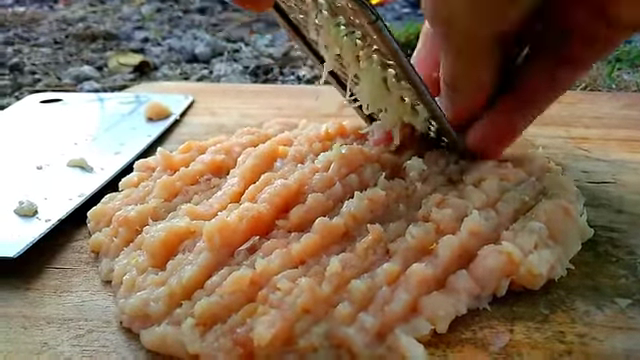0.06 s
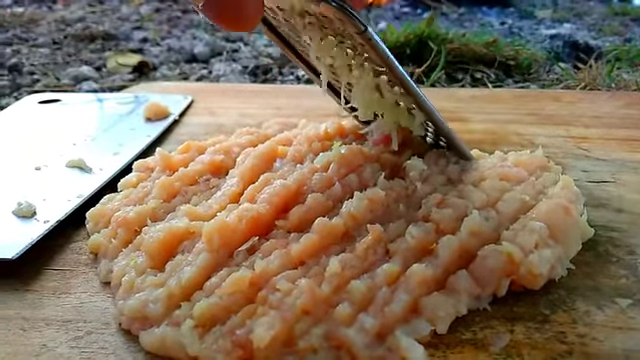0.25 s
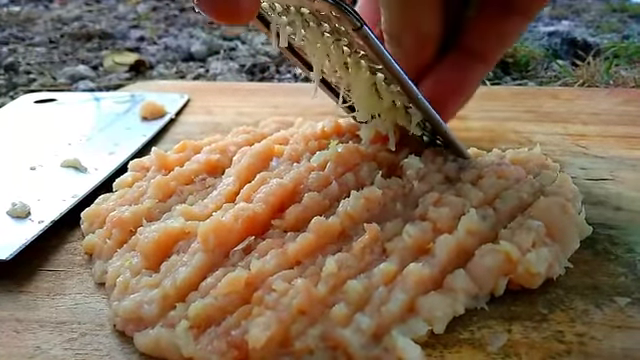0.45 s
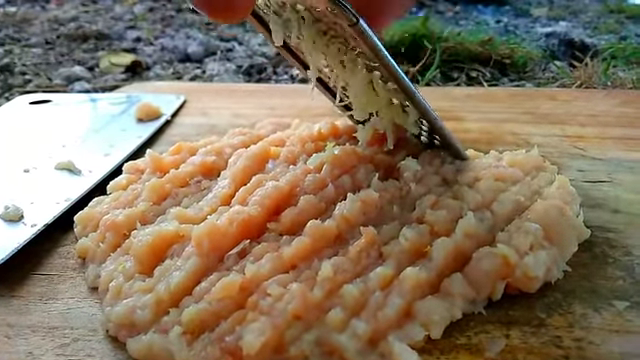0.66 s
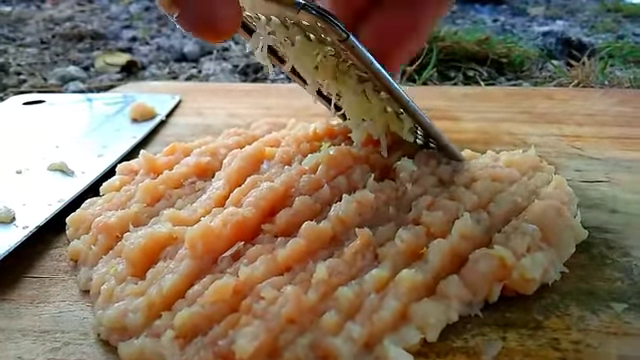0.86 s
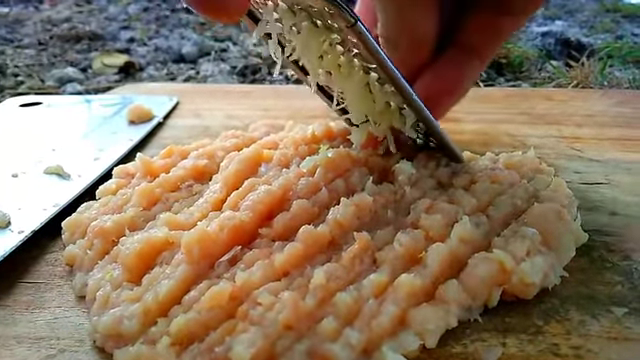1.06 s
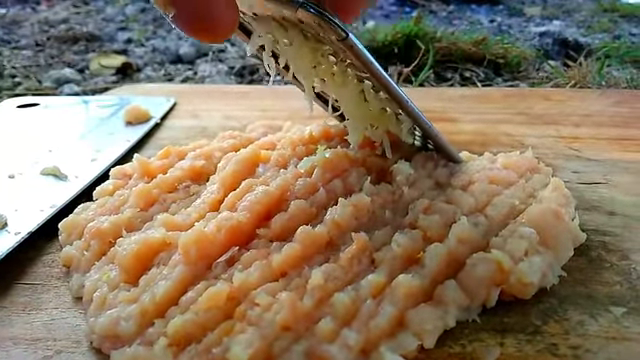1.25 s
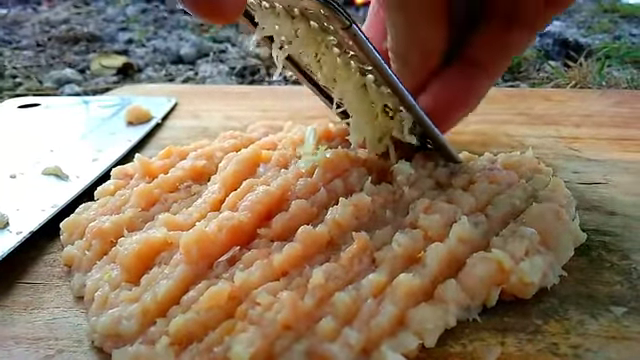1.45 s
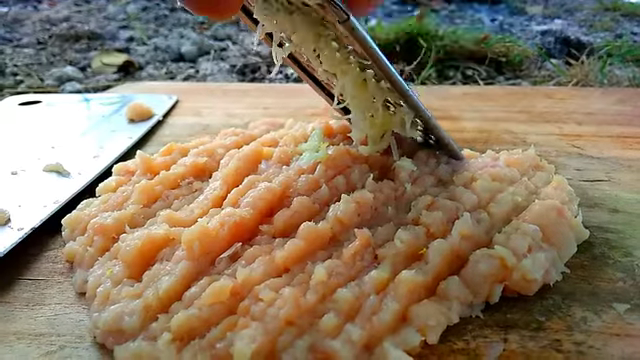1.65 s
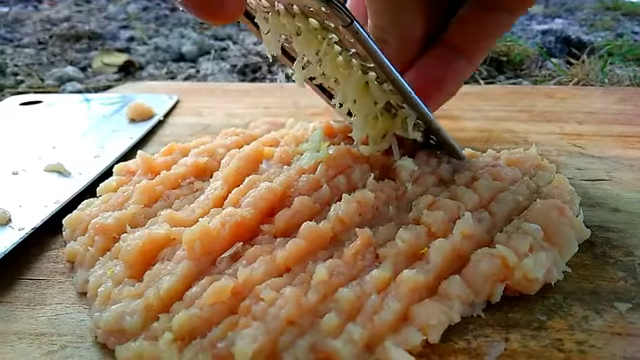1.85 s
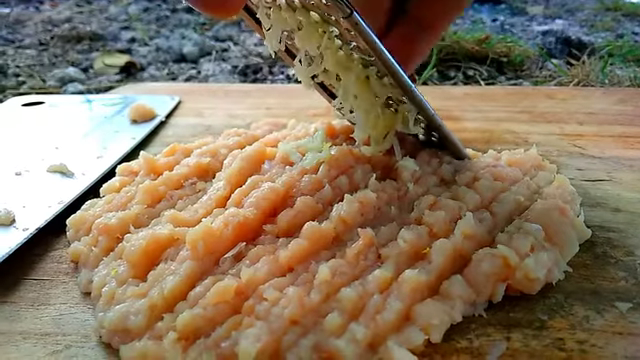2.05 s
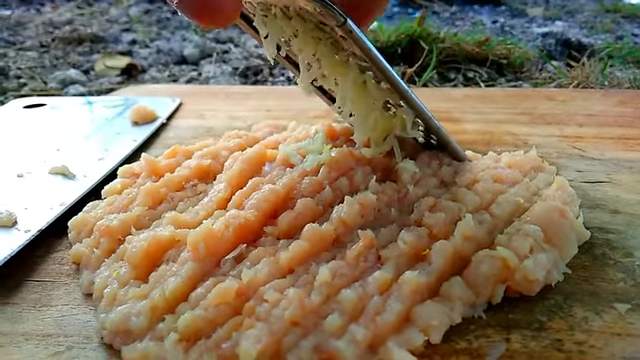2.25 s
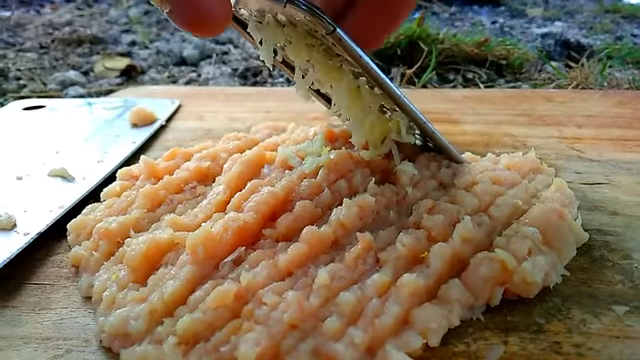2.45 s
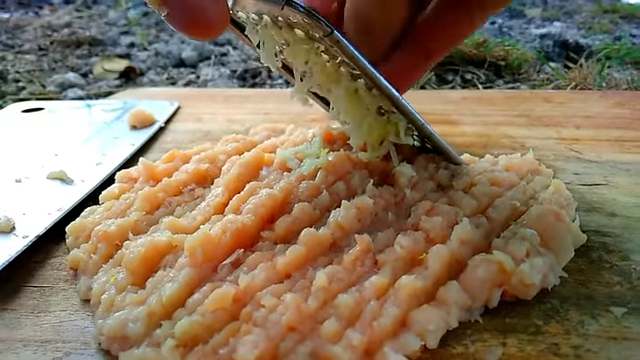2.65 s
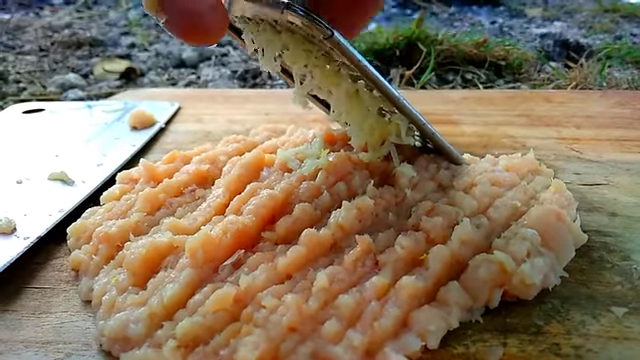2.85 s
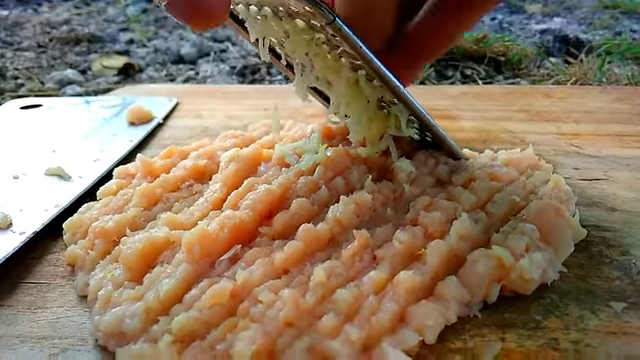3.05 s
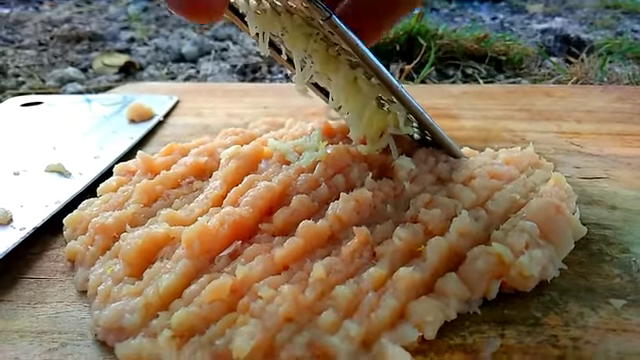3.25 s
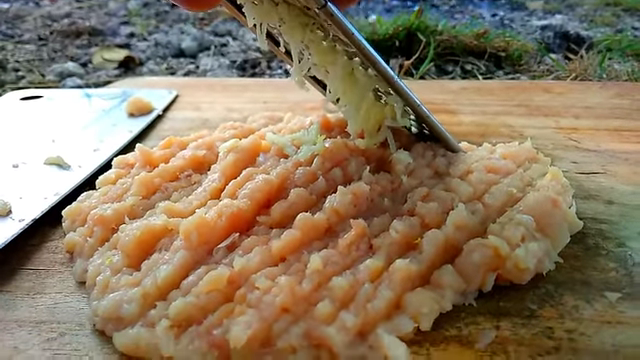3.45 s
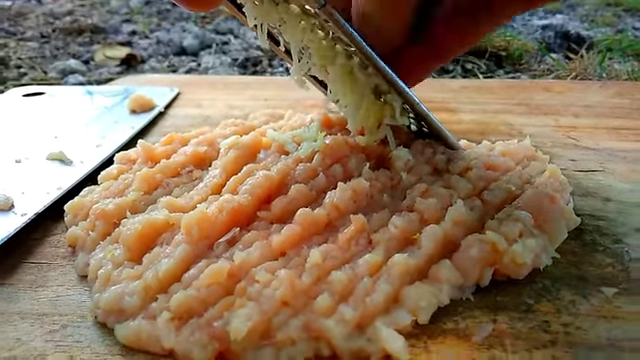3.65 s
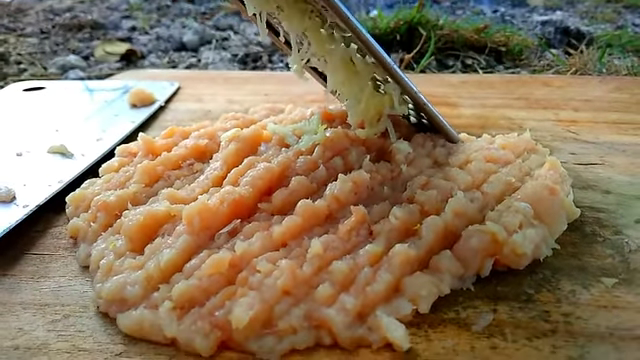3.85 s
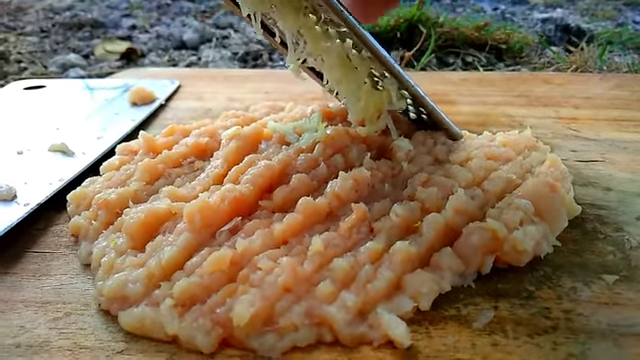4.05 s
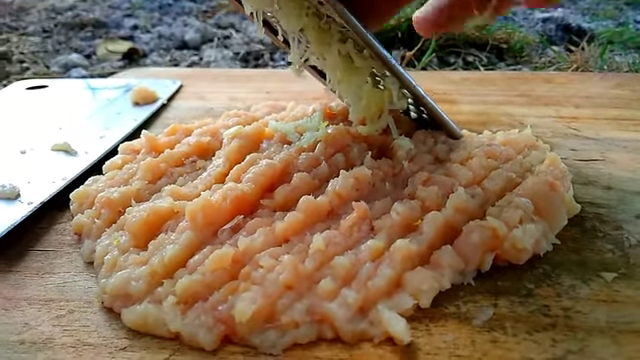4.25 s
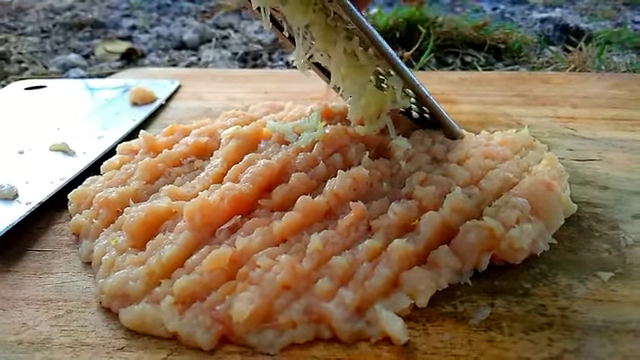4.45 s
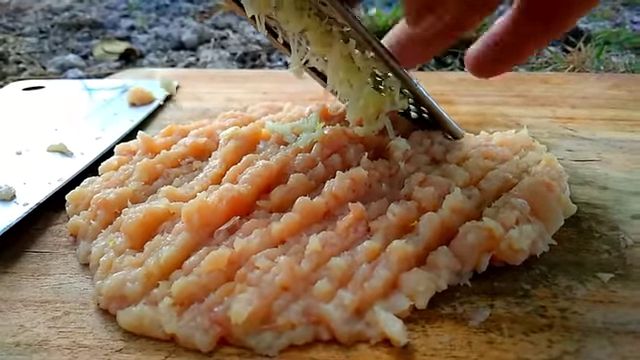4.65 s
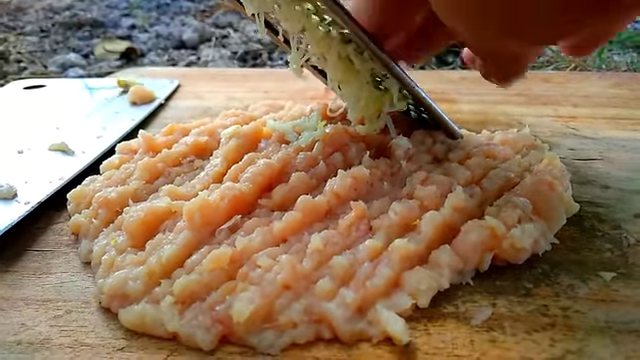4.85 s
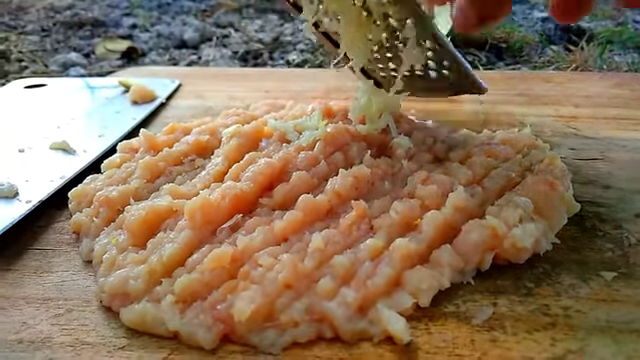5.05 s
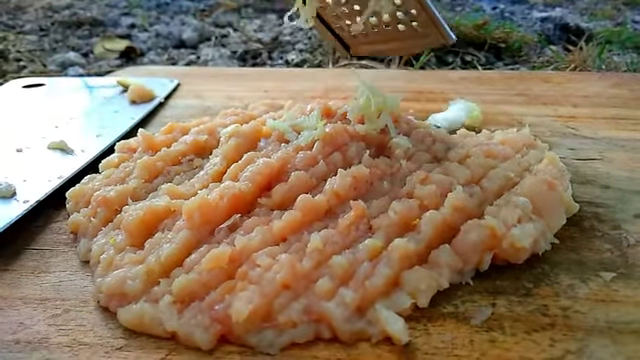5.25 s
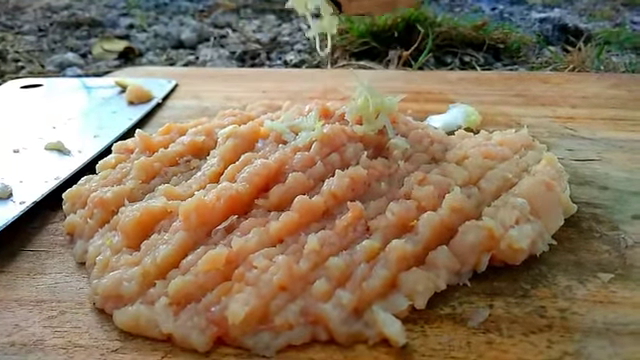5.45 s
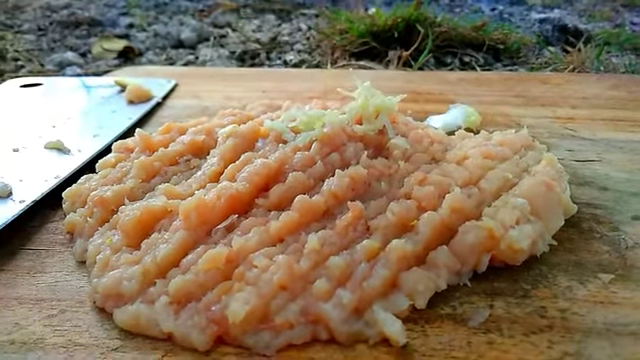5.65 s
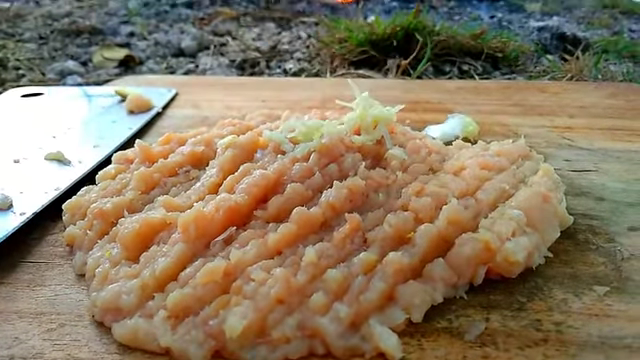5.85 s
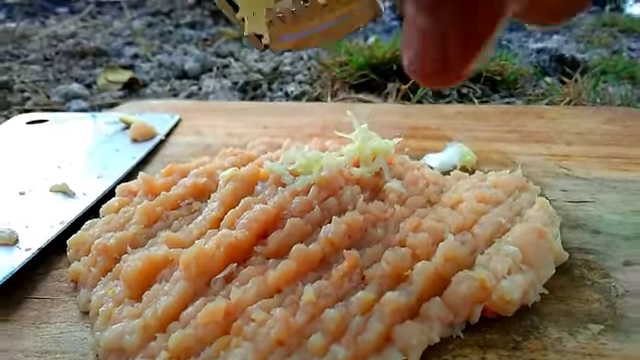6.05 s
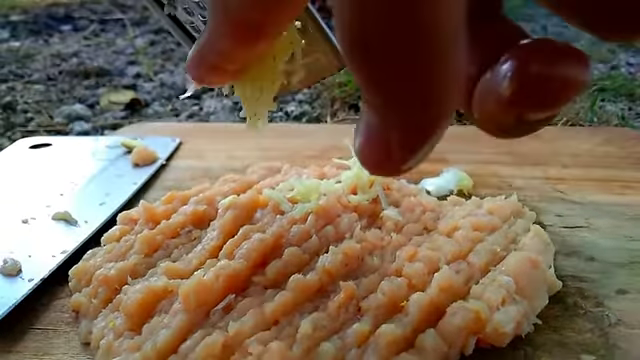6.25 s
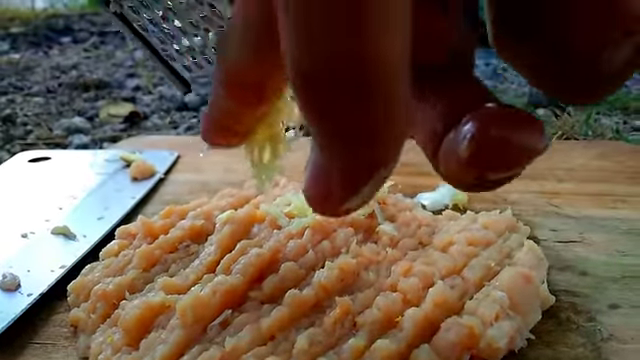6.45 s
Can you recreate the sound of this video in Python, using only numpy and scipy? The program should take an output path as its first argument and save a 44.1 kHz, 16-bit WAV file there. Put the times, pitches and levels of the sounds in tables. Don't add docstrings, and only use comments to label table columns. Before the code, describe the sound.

A root rasps over a metal grater in five quick bright strokes, then slower juddering rubs with snags, before fading into windy outdoor quiet.

```python
import sys
import numpy as np
from scipy import signal
from scipy.fft import rfft, irfft, next_fast_len
from scipy.io import wavfile
from scipy.ndimage import uniform_filter1d, map_coordinates

SR = 44100
rng = np.random.default_rng(int(sys.argv[2]) if len(sys.argv) > 2 else 0)


def volts_from_decibels(level):
    exponent = np.asarray(level, float) / 20
    return 10 ** exponent


def master(y):
    cut = np.clip(np.atleast_2d(y).T, -1, 1)
    pcm = np.round(cut * 32767)
    wavfile.write(sys.argv[1], SR, pcm.astype(np.int16))


N = 287519

# contact_s, length_s, rasp_db, firmest_at (0-1 of the way), shake_re_rasp_db
PUSHES = [
    (-0.05, 0.16, -24, 0.57, -0.5),
    (0.415, 0.18, -27.5, 0.48, 3),
    (0.856, 0.21, -27.5, 0.54, 2),
    (1.342, 0.2, -27, 0.45, 2.5),
    (1.811, 0.175, -29, 0.46, 2.5),
]
# contact_s, length_s, rasp_db, firmest_at (0-1), shake_re_rasp_db
SLOW_PUSHES = [
    (2.535, 0.16, -41, 0.63, 4),
    (2.935, 0.13, -38, 0.42, 3.5),
    (3.578, 0.14, -43, 0.5, 2),
    (4.166, 0.013, -54, 0.5, 7),
    (4.205, 0.046, -44.5, 0.35, 3.5),
    (4.862, 0.14, -47, 0.45, 9),
    (3.492, 0.0057, -68, 0.5, -16),
    (4.06, 0.067, -60, 0.84, -6.5),
    (4.595, 0.012, -64, 0.7, -32),
    (4.705, 0.053, -55, 0.34, 1),
]
# contact_s, length_s, rasp_db, firmest_at (0-1), shake_re_rasp_db
RETURNS = [(0.2, 0.165, -39.5, 0.64, -9.5), (0.262, 0.032, -46.5, 0.5, 5), (0.65, 0.14, -43, 0.68, -10),
           (0.69, 0.032, -52.5, 0.3, 3), (1.15, 0.14, -43.5, 0.58, -4.5), (1.648, 0.12, -43, 0.12, -4.5),
           (2.05, 0.06, -52.5, 0.7, -37), (2.11, 0.16, -62.5, 0.29, 6), (2.795, 0.1, -48.5, 0.46, -6.5),
           (3.14, 0.098, -68, 0.5, 4), (3.22, 0.068, -72, 0.18, 14), (3.765, 0.066, -58, 0.6, -7),
           (3.85, 0.088, -60.5, 0.6, 6.5), (4.79, 0.046, -62, 0.06, -2), (5.03, 0.064, -64, 0, -7.5),
           (3.15, 0.044, -55.5, 1, -22)]
# contact_s, length_s, rasp_db, firmest_at
# (0-1), shake_re_rasp_db
BRUSHES = [(3.37, 0.12, -89, 0.45, 11), (4.33, 0.071, -78.5, 0, -5), (6.7, 0.17, -82.5, 0, -10),
           (5.2, 0.12, -82.5, 0.4, 3.5), (6.8, 0.3, -76.5, 0.4, 1.5), (4.7, 0.27, -80.5, 0.9, -4.5),
           (4.0, 0.057, -70, 0.4, 3.5), (2.31, 0.3, -79, 0.5, -2), (0.56, 0.02, -62.5, 0.5, -3),
           (0.82, 0.022, -62.5, 0.5, -3.5), (1.31, 0.02, -62, 0.5, -3), (2, 0.02, -60.5, 0.5, -4.5),
           (0.22, 0.034, -61, 0.5, -3.5)]
# landing, swell, fade, lift (all dB/s), scrape_slope and plate_slope (times
# the rasp's), scrape_re_rasp_db, plate_follows (how far the plate follows the grip)
PUSH_STROKE = (2196, 82, 85.5, 797, 1.0, 1.47, -10, 1.6)
SLOW_STROKE = (1100, 76, 41, 391, 1.1, 1.42, -9.5, 2)
RETURN_STROKE = (331, 51.5, 78, 1293, 1.36, 1.97, -9, 1.54)
BRUSH_STROKE = (148, 17, 12, 148, 2.5, 0, -4, -2)
# start_s, peak_db
SNAGS = [(0.073, -18.5), (0.413, -23), (0.47, -24.5), (0.873, -23), (1.351, -27), (1.829, -25.5),
         (1.911, -11), (1.965, -23.5), (2.136, -44), (2.245, -34), (2.539, -30.5), (2.559, -15.5),
         (2.597, -26.5), (2.634, -21.5), (2.937, -43), (2.996, -38), (3.028, -14.5), (3.584, -28),
         (3.618, -23.5), (3.651, -18.5), (3.69, -13.5), (3.715, -23), (3.892, -35), (4.17, -32),
         (4.207, -23), (0.036, -23.5), (0.991, -12), (4.867, -25.5), (4.894, -24), (4.92, -26),
         (0.003, -16), (0.016, -19), (0.043, -11), (0.058, -21.5), (0.09, -24.5), (0.425, -27),
         (0.449, -28), (0.496, -17), (0.517, -20), (0.89, -21), (0.902, -22), (0.934, -16), (0.982, -15),
         (1.005, -19), (1.04, -18.5), (1.377, -28.5), (1.407, -17), (1.431, -20), (1.449, -12.5),
         (1.466, -17), (1.875, -15), (2.951, -17.5), (4.232, -35), (4.242, -28.5), (4.259, -32.5),
         (4.94, -26), (5.008, -36), (5.032, -43)]
# rasp_db, scrape_db, plate_db
STICK_DB = (-1.5, -4, -13)
# freq_hz, level_db
TEETH = [(3530, -33.5), (6000, -12), (7740, -11), (8160, -9.5), (10500, -2), (14300, -10.5), (14900, -6),
         (15800, -28.5)]
# freq_hz, level_db
SCRAPE = [(740, -14.5), (1250, -8), (1580, -8.5), (1700, -3.5), (2110, -3.5), (2290, -1.5), (3770, -8.5),
          (4240, -4.5), (4770, -4.5), (6500, -11), (8450, -41.5), (14300, -120)]
# freq_hz, width_hz, level_db
PLATE = [
    (529, 40, -3.5),
    (600, 60, 1.5),
    (663.5, 47.6, 6),
    (750.6, 95, 4),
    (838.4, 80, 3.5),
    (960.5, 88, 6),
    (1081, 100, 1.5),
]
# freq_hz, left_minus_right_db
LEAN = [(200, 4), (400, 6.5), (1300, 4), (4400, 2), (8000, 0), (15000, -1)]
# freq_hz, level_db
FAR_COLOUR = [(12, -32.5), (20, -8.5), (38, -7.5), (70, 0.5), (98, -7), (175, -6), (315, -24), (667, -31.5),
              (881, -42), (7730, -52), (10500, -42.5), (15500, -64)]
# freq_hz, likeness (0-1)
FAR_ALIKE = [(40, 0.1), (130, 1), (400, 0.21), (1400, 0.13)]
# time_s, level_db
DRONE = [
    (0, -52.5),
    (2, -55),
    (4.4, -50.5),
    (5.299, -53.5),
    (6.5, -59.5),
]
# freq_hz, width_hz, level_db
THUD = [
    (647, 61, 5),
    (960, 19, -13),
    (2300, 1200, -42),
]
# start_s, peak_db, pitch_hz, t60_s
TAPS = [(2.09, -47, 676, 0.054), (2.186, -47.5, 790, 0.048), (3.42, -51.5, 690, 0.046),
        (3.985, -49, 940, 0.04), (4.046, -46, 3000, 0.005), (4.068, -58, 1050, 0.035),
        (4.642, -45, 960, 0.027), (4.747, -47, 860, 0.016), (4.816, -47, 786, 0.11),
        (5.256, -57, 955, 0.03), (5.818, -59.5, 5880, 0.015), (5.953, -62.5, 5500, 0.0086),
        (5.99, -85, 2196, 0.16), (6.025, -77.5, 2160, 0.1), (4.715, -45.5, 650, 0.048),
        (4.724, -44, 1055, 0.048), (4.758, -48, 1110, 0.052), (4.762, -56, 623, 0.03),
        (4.832, -48, 790, 0.045), (4.128, -63, 1040, 0.03), (0.273, -42, 920, 0.065),
        (0.29, -48, 985, 0.045), (0.688, -39.5, 983, 0.09), (1.635, -44, 970, 0.064),
        (5.72, -75.5, 1490, 0.031), (5.915, -73, 1350, 0.04), (6.26, -77, 2000, 0.06),
        (5.835, -70, 5000, 0.011), (4.588, -52, 11500, 0.06), (4.598, -48.5, 11400, 0.06),
        (4.607, -46, 11150, 0.05), (0.006, -22, 580, 0.091), (0.034, -21, 590, 0.12),
        (0.066, -23, 600, 0.14), (2.787, -44.5, 700, 0.072), (3.845, -46, 649, 0.05),
        (3.867, -46, 701, 0.05), (3.908, -43, 719, 0.045), (3.922, -43, 681.4, 0.05)]
# start_s, peak_db, mid_re_peak_db
RIPS = [(0.0063, -25, -27), (0.51, -18, -25), (0.495, -22, -25), (1.42, -13, -25), (1.941, -23, -16),
        (2.9452, -32.5, -25.5), (4.13, -42.5, -25), (4.2138, -17.5, -30), (4.232, -36, -25),
        (2.998, -18, -25), (4.9182, -24.5, -23), (4.8953, -33, -25), (3.651, -30, -10), (3.716, -34, -7),
        (2.635, -29, -7), (6.499, -52, -12), (1.911, -22, -15), (1.966, -26, -15), (3.8, -44, -30),
        (3.2, -39, -30)]
# start_s, peak_db, mid_re_peak_db
SNAPS = [(0.193, -38.5, -25), (0.3934, -33, -27), (0.5504, -22, 16.5), (0.7005, -25, -9),
         (1.3097, -34, -40), (1.6476, -21, -36), (2.0303, -17, -40), (2.3747, -52.5, -15.5),
         (2.524, -34, 6.5), (2.545, -20.5, -44), (2.56, -18, 6), (2.8235, -36, -30), (3.2195, -36, -32),
         (3.4971, -42, -26.5), (3.6898, -44.5, -18), (3.7975, -40, -39), (3.9853, -41, -2),
         (4.0452, -36.5, 9), (4.126, -31, -33), (4.1619, -19, -42), (4.2073, -15, -24), (4.3878, -56, -18),
         (4.6013, -51, -44.5), (4.9193, -26, -21), (5.2508, -56, -11), (5.3815, -54.5, -13),
         (5.8178, -62, -2), (5.9534, -53, -20.5), (6.502, -53, -13.5)]
# start_s, peak_db, mid_re_peak_db
TICKS = [(0.849, -20, -25), (0.853, -15.5, -30), (0.881, -15, -27), (1.3274, -42, -25),
         (1.3334, -19.5, -25), (1.565, -36, -25), (1.5927, -42, -23), (1.805, -28, -25), (1.8166, -33, -23),
         (2.595, -36, -25), (2.6057, -40, -25), (2.789, -40, -25), (2.9266, -30, -25), (3.049, -31, -25),
         (3.1501, -38, -25), (3.1905, -30, -25), (3.5745, -27, -28), (3.6121, -36, -25), (3.6196, -24, -25),
         (3.7722, -41, -25), (3.9667, -42, -25), (4.091, -47, -25), (4.1887, -22, -27), (4.7091, -39, -25),
         (4.787, -40, -25), (4.8947, -30, -25), (4.9074, -26, -25), (4.9555, -37, -25), (5.045, -35, -26),
         (6.0544, -67, -24.5)]
# start_s, peak_db, pitch_hz, port (0 left, 1 right)
PUFFS = [(0.42, -40, 91, 1), (0.615, -32.5, 51.6, 1), (1.162, -33, 42.3, 1), (1.376, -23.5, 90, 0),
         (1.5, -22.5, 121, 1), (1.531, -25, 91, 1), (1.958, -35.5, 51.7, 1), (2.662, -35.5, 47.7, 1),
         (2.904, -23, 42.5, 1), (2.952, -17.5, 53, 1), (3.026, -20, 48, 1), (3.1, -7.5, 63.2, 1),
         (3.188, -26.5, 61.5, 0), (3.236, -24.5, 63, 1), (3.324, -15, 63, 1), (3.38, -18, 57, 1),
         (3.412, -22, 67, 0), (3.451, -16, 60, 1), (3.53, -19, 53.8, 0), (3.594, -18.5, 62.6, 0),
         (3.687, -28.5, 49, 1), (3.858, -23, 48.3, 1), (4.049, -28.5, 55, 1), (4.171, -30, 50, 1),
         (4.388, -36, 67, 1), (4.817, -39, 42.05, 1), (5.649, -22, 76.1, 0), (5.681, -23, 62.16, 0),
         (5.882, -27, 77.1, 0), (6.232, -36.5, 75.1, 1)]
# start_s, length_s, peak_db, port (0 left, 1 right)
GUSTS = [(1.56, 0.34, -46, 1), (1.83, 0.042, -38.5, 0), (2.578, 0.11, -33, 1), (3.122, 0.077, -32, 1),
         (3.129, 0.14, -32, 0), (3.502, 0.16, -27.5, 1), (3.448, 0.05, -24.5, 0), (3.614, 0.23, -37, 0),
         (3.899, 0.32, -33, 1), (4.998, 0.35, -45.5, 0), (5.193, 0.0525, -36.5, 1), (5.579, 0.05, -28.5, 0),
         (5.598, 0.03, -33.5, 1), (5.704, 0.021, -32, 0), (5.918, 0.15, -37, 0), (5.95, 0.047, -36.5, 1)]
# freq_hz, threshold_db
FAINT_LINE_DB = [(700, -70), (1300, -18), (2000, -7.5), (3500, -4), (7500, -5), (9500, -10), (15500, -6)]
# freq_hz, luck (sigmas)
BAND_LUCK = [(1000, 4), (2500, 1.2), (3500, .3), (4600, .05), (5800, .4), (8000, .95), (9500, 1.6),
             (12000, 1.4), (15500, .8)]


def unit(x):
    return x / np.sqrt(np.mean(x ** 2) + 1e-20)


def along(points, hz):
    f, v = np.transpose(points)
    return np.interp(np.log(hz + 1), np.log(f + 1), v)


def filtered(x, response):
    m = next_fast_len(N + SR // 2)
    hz = np.fft.rfftfreq(m, 1 / SR)
    return irfft(rfft(x, m) * response(hz), m)[..., :N]


def wobble(rate):
    return map_coordinates(rng.standard_normal(1000), [np.arange(N) * rate / SR])


def grit(per_s, spread_db, smooth):
    tear = rng.random((2, N)) < per_s / SR
    size_db = spread_db * np.minimum(rng.exponential(size=(2, N)), 2)
    size = volts_from_decibels(size_db) * rng.standard_normal((2, N))
    return unit(tear * size) + smooth * rng.standard_normal((2, N))


def ports(pair, alike, colour):
    m = next_fast_len(N + SR // 4)
    hz = np.fft.rfftfreq(m, 1 / SR)
    sides = np.array([[1], [-1]])
    turn = np.arccos(np.clip(along(alike, hz), -1, 1)) / 2
    shared, opposed = rfft(pair, m) * colour(hz)
    lead = np.exp(1j * np.pi * sides * hz * 4 / SR)
    path = volts_from_decibels(sides * along(LEAN, hz) / 2) * lead
    mix = np.cos(turn) * shared + sides * np.sin(turn) * opposed
    return irfft(path * mix, m)[:, :N]


def hand(rows, stroke):
    landing, swell, fade, lift, scrape_slope, plate_slope, scrape_db, follows = stroke
    scrape_per_shake = 0.45
    t, levels = np.arange(N) / SR, np.zeros((3, N))
    for s, length, db, firmest, shake_db in rows:
        span = slice(max(round((s - .25) * SR), 0), round((s + length + .25) * SR))
        since = t[span] - s
        plate_firmest = .5 + follows * (firmest - .5)
        past = since - length * np.array([[firmest], [firmest], [plate_firmest]])
        grip_db = np.where(past < 0, swell * past, -fade * past)
        away_db = landing * np.minimum(since, 0) - lift * np.maximum(since - length, 0)
        offset_db = [[0], [scrape_db + scrape_per_shake * shake_db], [shake_db]]
        slopes = [[1], [scrape_slope], [plate_slope]]
        levels[:, span] += volts_from_decibels(db + (grip_db + away_db) * slopes + offset_db)
    return levels


def catches():
    slip_db, slip_t60_s = -11, 0.055
    stuck, slip = np.zeros((2, N))
    when, size_db = np.transpose(SNAGS)
    at = np.round(when * SR).astype(int)
    stuck[at] = 1
    slip[at] = volts_from_decibels(size_db + slip_db)
    stuck = np.convolve(stuck, np.hanning(800))[580:N + 580]
    dying = volts_from_decibels(-60 * np.arange(SR // 8) / SR / slip_t60_s)
    return stuck, np.abs(signal.fftconvolve(slip, dying)[:N])


def rasp():
    strokes = hand(PUSHES, PUSH_STROKE) + hand(SLOW_PUSHES, SLOW_STROKE)
    strokes += hand(RETURNS, RETURN_STROKE) + hand(BRUSHES, BRUSH_STROKE)
    rasp_level, scrape_level, shake_level = strokes
    stuck, slip = catches()
    rasp_held_db, scrape_held_db, plate_held_db = np.multiply.outer(STICK_DB, stuck)
    grip = wobble(45)
    bright = ports(grit(6400, 1.4, 0.8), [(9000, 0.14)], lambda hz: volts_from_decibels(along(TEETH, hz)))
    dull = ports(grit(1500, 1.8, 0.9), [(1400, 0.6), (4000, 0.35)], lambda hz: volts_from_decibels(along(SCRAPE, hz)))
    bright_gain = rasp_level * volts_from_decibels(rasp_held_db + 0.6 * grip + 1.0 * wobble(160) + 2.5)
    dull_gain = scrape_level * volts_from_decibels(scrape_held_db + 1.4 * grip + 0.98 * wobble(100) + 1.5)
    dull_gain = dull_gain + volts_from_decibels(-25) * slip
    friction = bright_gain * unit(bright) + dull_gain * unit(dull)
    shake = shake_level * volts_from_decibels(plate_held_db + 0.94 * grip + 0.52 * wobble(22) + 7) + slip
    share_db = 20 * np.log10((shake_level + 1e-7) / (rasp_level + 1e-7))
    firm = (0.5 + np.tanh((share_db + 3.0) / 4)) / 2
    return friction, shake, firm


def patchy(x, depth_db):
    z = signal.stft(x, nperseg=256)[2]
    field = uniform_filter1d(rng.standard_normal(z.shape[1:]), size=5, axis=0)
    field = uniform_filter1d(field, size=7, axis=1)
    gain = volts_from_decibels(depth_db * unit(field) - depth_db ** 2 / 9)
    return signal.istft(z * gain, nperseg=256)[1][:, :N]


def plate(hz, damping):
    modes = 0
    for k, (c, w, db) in enumerate(PLATE):
        modes = modes + (-1) ** k * volts_from_decibels(db) * 1j * hz * w / (c * c - hz * hz + 1j * hz * w * damping)
    board = (1j * hz) ** 2 / (480 ** 2 - hz * hz + 1j * hz * 200)
    return modes * board ** 2


def shaken(level, firm):
    push, skim = grit(500, 1.2, 0.67) * level * [firm, 1 - firm]
    tilt = lambda hz: volts_from_decibels(-5.5) * (hz / 800) ** 2.0 / (1 + (hz / 1300) ** 4)
    drive = push + filtered(skim, tilt)
    ring = lambda hz: plate(hz, damping=1.1)
    return ports(np.array([drive, np.roll(drive, 300)]), [(600, 0.97), (1100, 1.0)], ring)


def far():
    air = ports(rng.standard_normal((2, N)), FAR_ALIKE, lambda hz: volts_from_decibels(along(FAR_COLOUR, hz)))
    air = volts_from_decibels(-54.5 + 1.1 * wobble(3.7) + 1.3 * wobble(12)) * unit(air)
    level_db = np.interp(np.arange(N) / SR, *np.transpose(DRONE))
    turns = np.cumsum(87 + 1.8 * wobble(6.5)) / SR
    side_db = [[2.2], [-2.2]]
    return air + volts_from_decibels(level_db + 0.6 * wobble(19.0) + side_db) * np.sin(2 * np.pi * turns)


def knocks():
    blows = np.zeros(N)
    for s, db in SNAGS:
        blows[round(s * SR)] = volts_from_decibels(db + 29)

    def held(hz):
        thud = sum(volts_from_decibels(db) * 1j * hz * w / (c * c - hz * hz + 1j * hz * w) for c, w, db in THUD)
        board = (1j * hz) ** 2 / (430 ** 2 - hz * hz + 1j * hz * 500)
        soft = 1 / (1 + 1j * hz / 900) ** 2
        return thud * board * soft * 1.5

    return ports(np.array([blows, np.roll(blows, 40)]), [(600, 1.0), (2500, 1.0)], held)


def taps():
    t, out = np.arange(2000) / SR, np.zeros(N + 2000)
    for (s, db, hz, t60), chance in zip(TAPS, rng.standard_normal((len(TAPS), 12))):
        ring = 0
        for off in chance:
            ring = ring + np.sin(2 * np.pi * hz * (1 + 0.161 * np.tanh(off)) * t + 9 * off)
        out[round(s * SR):][:2000] += volts_from_decibels(db - 60 * t / t60) * np.tanh(t * hz / 1.5) * ring / 2.4
    low_cut = lambda hz: 1 / (1 + (480 / (hz + 1)) ** 16)
    return ports(np.array([out[:N], np.roll(out[:N], 40)]), [(600, 0.9), (5000, 0.55)], low_cut)


def snaps(rows, t60, rise_s):
    t = np.arange(1200) / SR
    envelope = volts_from_decibels(-60 * t / t60) * np.tanh((t + 1e-5) / rise_s)
    high, mid = np.zeros((2, 2, N + 1200))
    for s, db, mid_db in rows:
        burst = np.tile(rng.standard_normal((2, 2, 400)), 3) * envelope
        high[:, round(s * SR):][:, :1200] += volts_from_decibels(db + 2.0) * burst[0]
        mid[:, round(s * SR):][:, :1200] += volts_from_decibels(db + mid_db - 4.5) * burst[1]
    bright = ports(high[:, :N], [(9000, 0.13)], lambda hz: volts_from_decibels(along(TEETH, hz)))
    return bright + ports(mid[:, :N], [(3000, 0.33)], lambda hz: volts_from_decibels(along(SCRAPE, hz) / 2))


def gust_puffs():
    puffs_per_s, size_spread_db = 25, 2.5
    gust_hz, pitch_spread = 55, 0.15
    rows = []
    for (s, length, db, port), chance in zip(GUSTS, rng.standard_normal((len(GUSTS), 12, 3))):
        count = int(np.clip(round(length * puffs_per_s), 1, 12))
        for k, (late, size, quick) in enumerate(chance[:count]):
            start = s + length * (k + .5 + np.tanh(late) / 3) / count
            rows.append((start, db + size_spread_db * size, gust_hz * np.exp(pitch_spread * quick), port))
    return rows


def wind():
    out, t = np.zeros((2, N + 8000)), (np.arange(8000) - 4000) / SR
    chance = rng.random((200, 2))
    for (s, db, hz, port), (turn, length) in zip(PUFFS + gust_puffs(), chance):
        cycles = t * hz
        bell = np.exp(-(cycles / np.where(cycles < 0, .35, 0.24 + 2.0 * length)) ** 2)
        swing = np.sin(2 * np.pi * (cycles - 0.36 * cycles ** 2 + turn))
        out[int(port > .5), round(s * SR):][:8000] += volts_from_decibels(db + 2.0) * bell * swing
    puffs = filtered(out[:, 4000:N + 4000], lambda hz: 1j * hz / (18 + 1j * hz))
    flutter = filtered(rng.standard_normal((2, N)), lambda hz: 1 / (1 + (hz / 130) ** 3.65))
    swell = uniform_filter1d(np.abs(puffs), 2500)
    return puffs + volts_from_decibels(-3.5) * swell * unit(flutter)


def scene():
    friction, shake, firm = rasp()
    grater = patchy(friction, depth_db=1.6) + shaken(shake, firm) + knocks() + taps()
    fibres = snaps(RIPS, 0.045, 0.002) + snaps(SNAPS, 0.011, 1e-5) + snaps(TICKS, 0.009, 0.0002)
    return grater + fibres + far() + wind()


def thinned(x):
    hz, t, z = signal.stft(x, SR, nperseg=2048, noverlap=1536)
    power = np.mean(np.abs(z) ** 2, axis=0)
    bright_db = 10 * np.log10(np.mean(power[(hz > 9000) & (hz < 12000)], axis=0) + 1e-20)
    idle = np.clip(1 - (bright_db - np.percentile(bright_db, 20)) / 10, 0, 1)
    local = uniform_filter1d(uniform_filter1d(power, size=40, axis=0), size=5, axis=1)
    threshold_db = along(FAINT_LINE_DB, hz)[:, None] - 6 * idle
    keep = uniform_filter1d(power, size=3, axis=1) > local * volts_from_decibels(threshold_db) ** 2
    luck = rng.standard_normal((len(hz) // 18 + 1, len(t)))
    luck = unit(uniform_filter1d(luck, size=6, axis=1))
    luck = np.repeat(luck, 18, axis=0)[:len(hz)]
    top = (hz > 12900)[:, None]
    limit = along(BAND_LUCK, hz)[:, None] + idle * np.where(top, -1.1, 1.5)
    limit = limit + .35 * np.tanh((bright_db - bright_db.max() + 18) / 5)
    keep &= luck < limit
    keep &= (hz < 15800)[:, None]
    return signal.istft(z * keep, SR, nperseg=2048, noverlap=1536)[1][:, :N]


def low_pass(x):
    return signal.sosfilt(signal.butter(12, 16660, fs=SR, output="sos"), x)


def record(dry):
    rounded = dry / (1 + np.abs(dry / .42) ** 4) ** .25
    return low_pass(thinned(rounded))


dry = scene()
out = record(dry)
master(out)
```